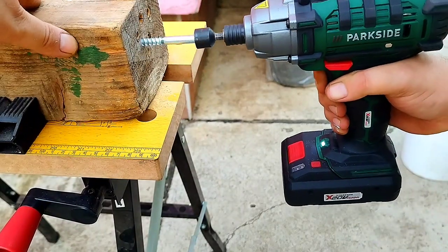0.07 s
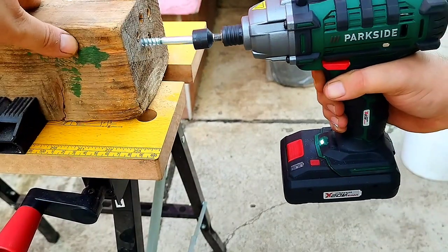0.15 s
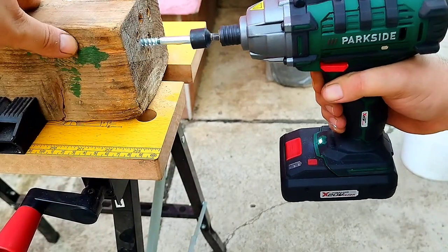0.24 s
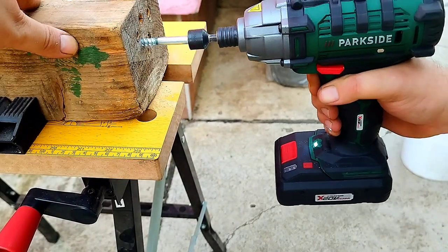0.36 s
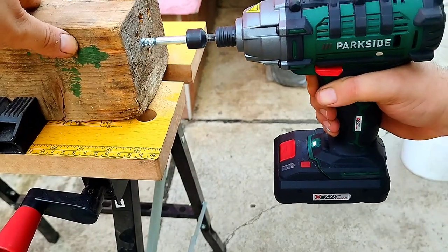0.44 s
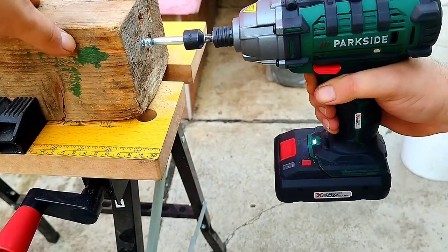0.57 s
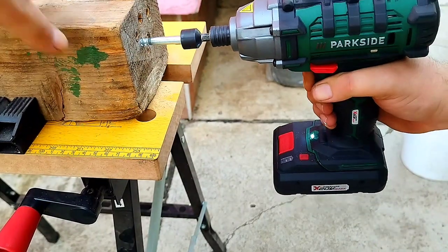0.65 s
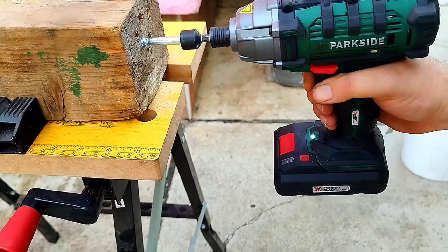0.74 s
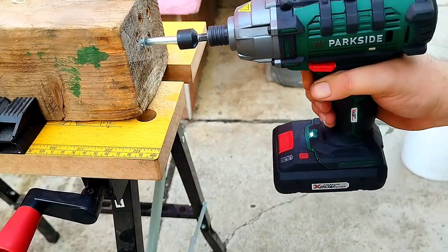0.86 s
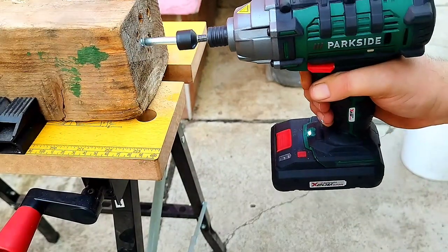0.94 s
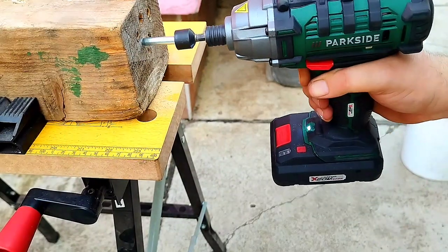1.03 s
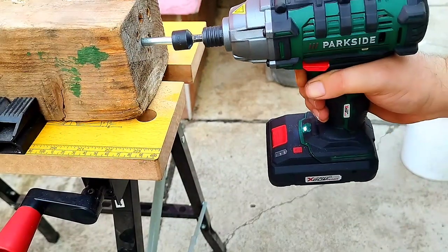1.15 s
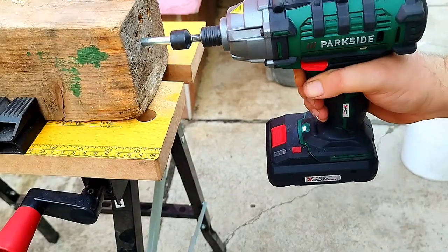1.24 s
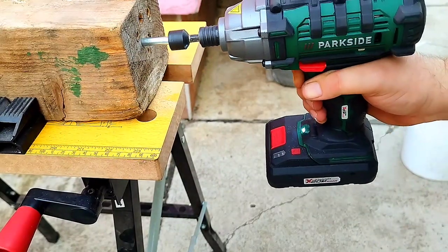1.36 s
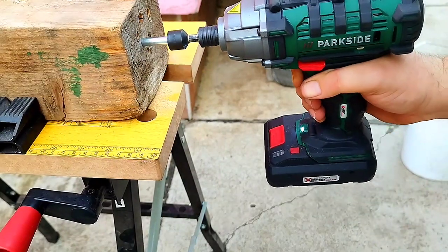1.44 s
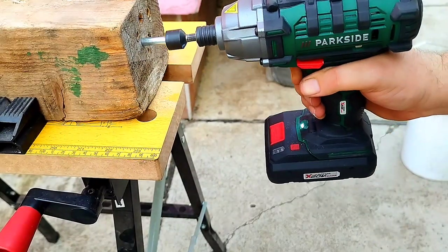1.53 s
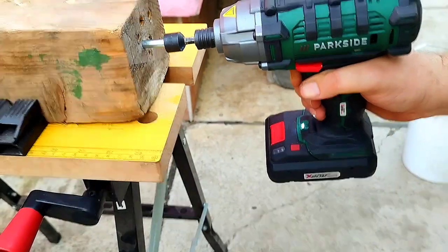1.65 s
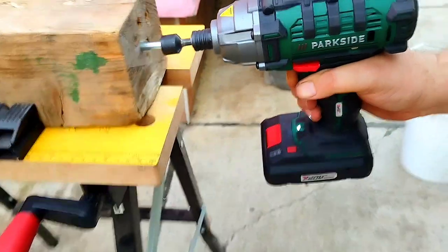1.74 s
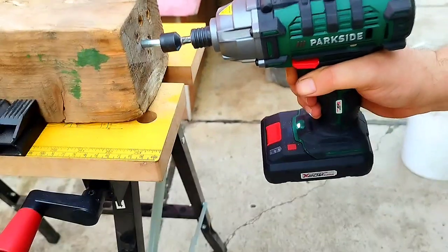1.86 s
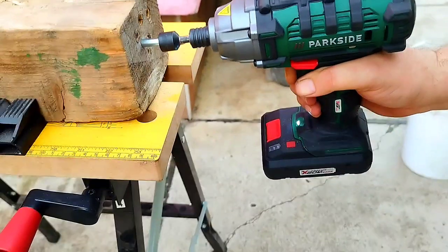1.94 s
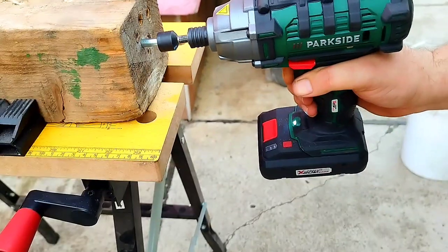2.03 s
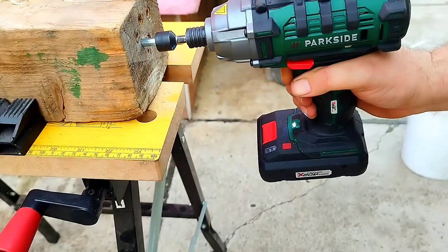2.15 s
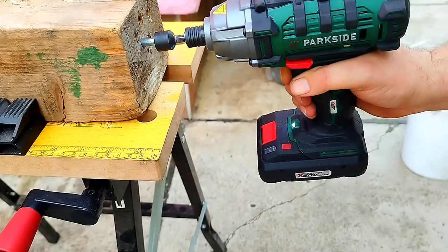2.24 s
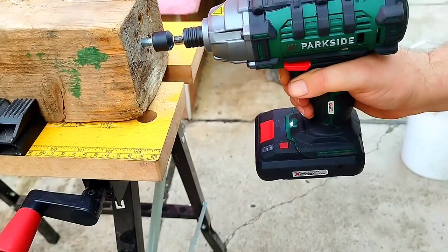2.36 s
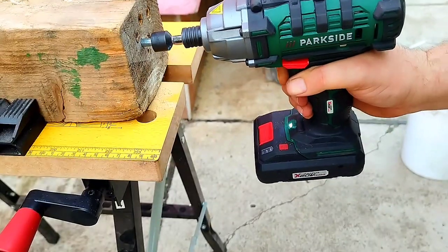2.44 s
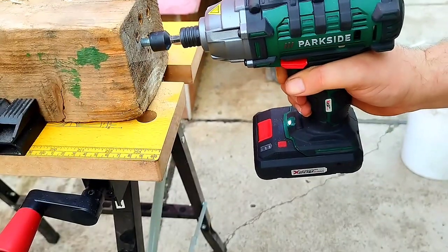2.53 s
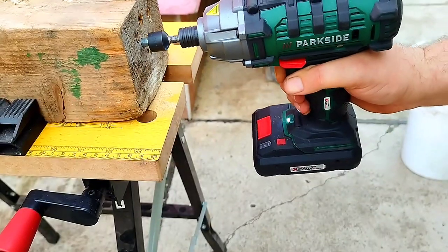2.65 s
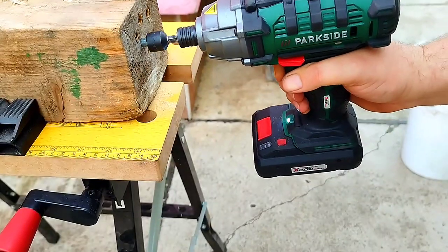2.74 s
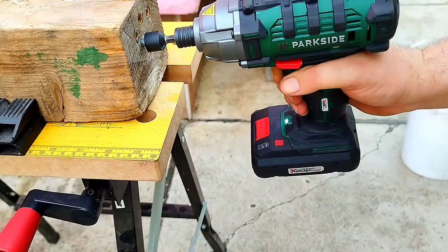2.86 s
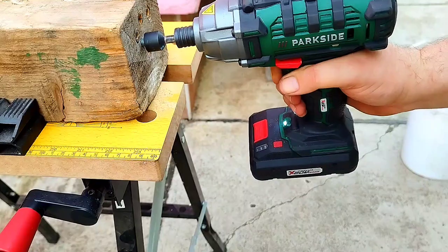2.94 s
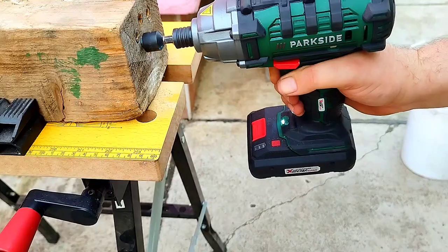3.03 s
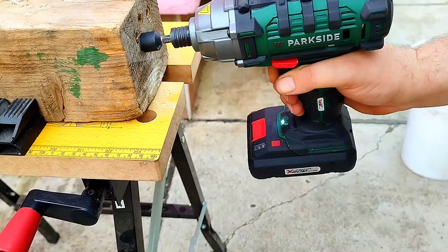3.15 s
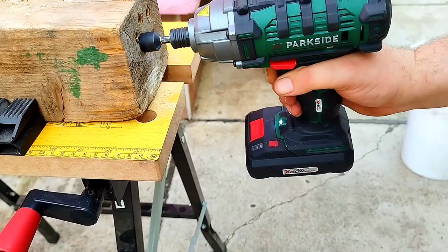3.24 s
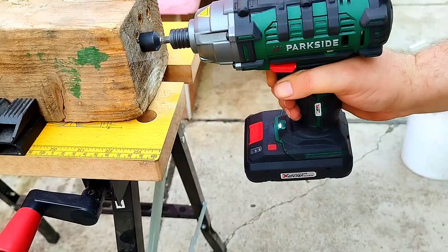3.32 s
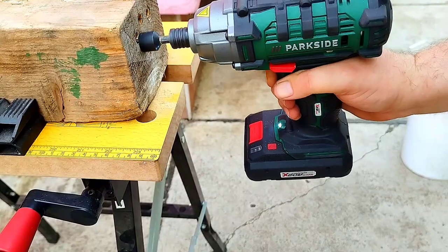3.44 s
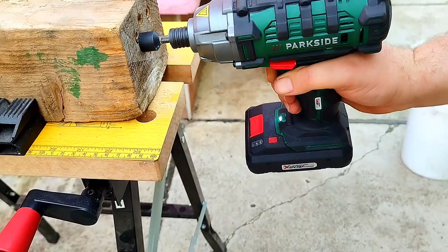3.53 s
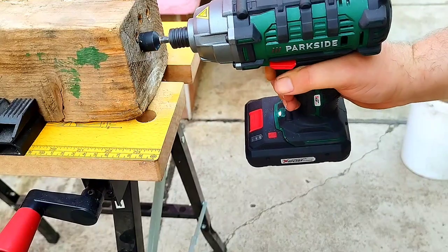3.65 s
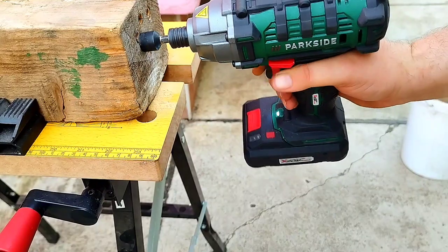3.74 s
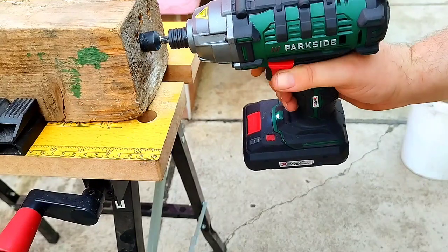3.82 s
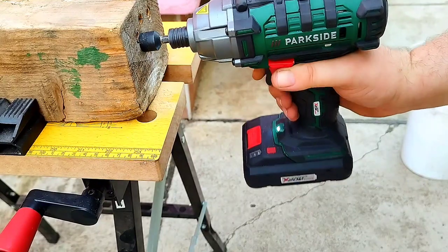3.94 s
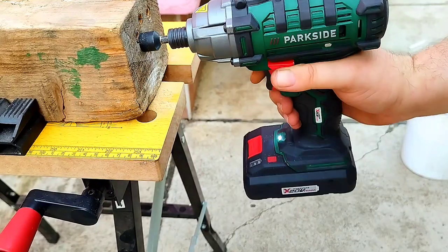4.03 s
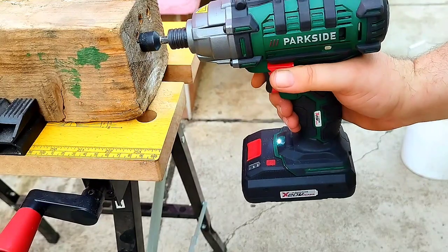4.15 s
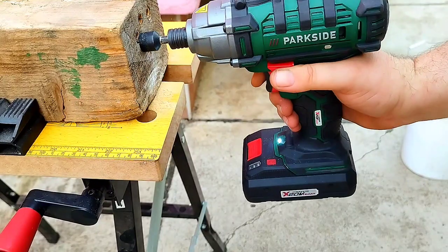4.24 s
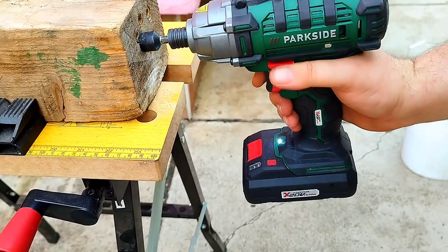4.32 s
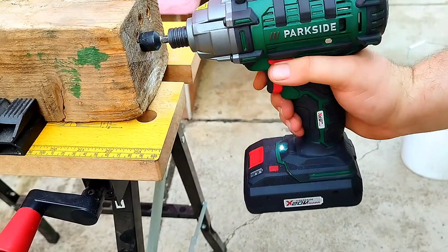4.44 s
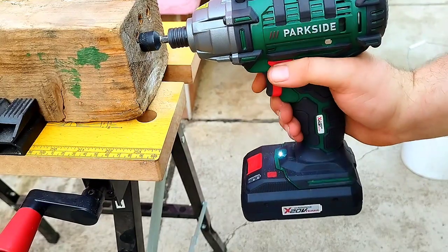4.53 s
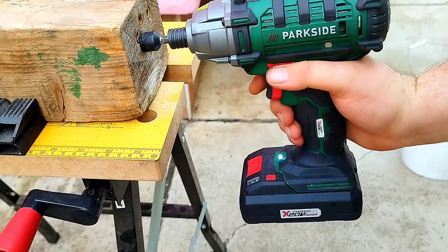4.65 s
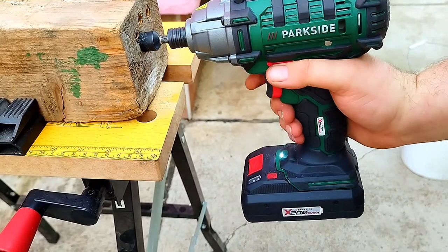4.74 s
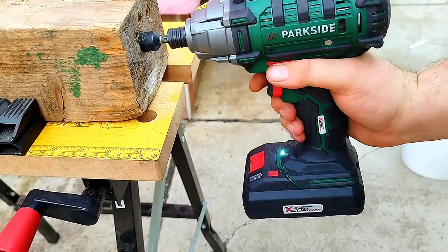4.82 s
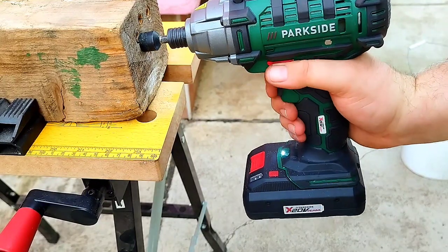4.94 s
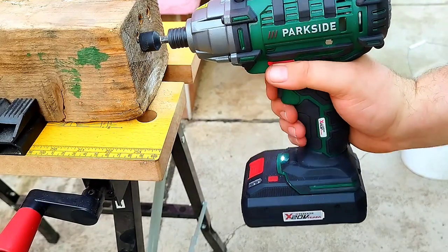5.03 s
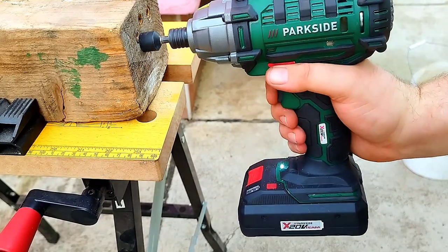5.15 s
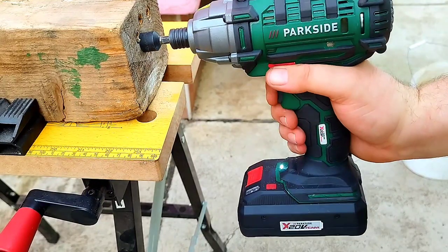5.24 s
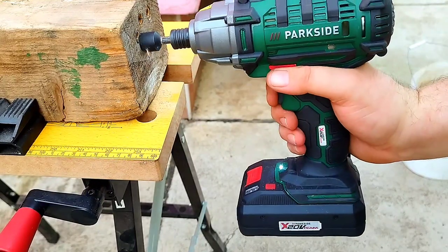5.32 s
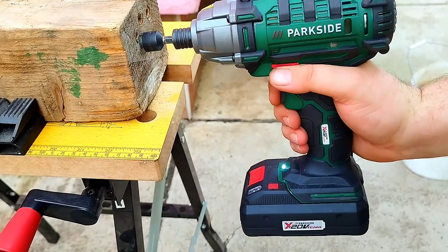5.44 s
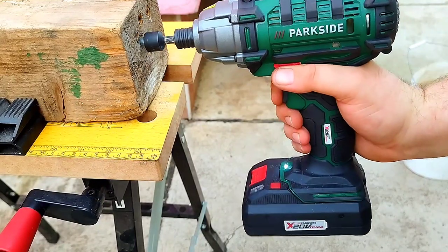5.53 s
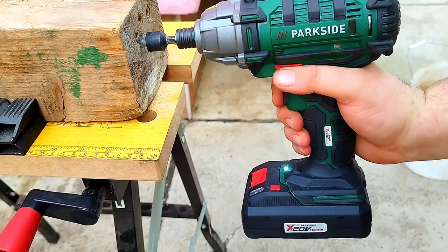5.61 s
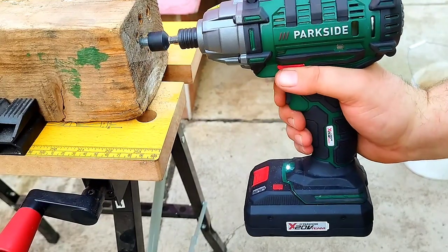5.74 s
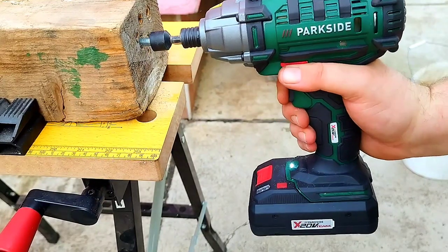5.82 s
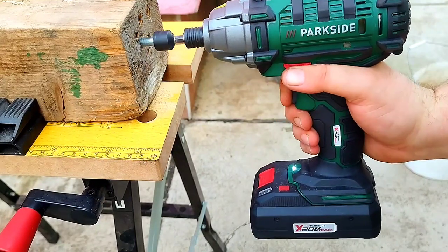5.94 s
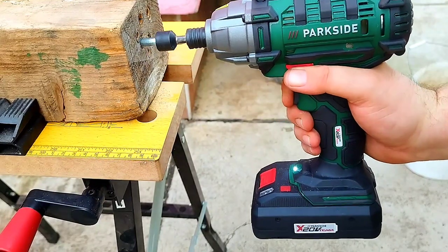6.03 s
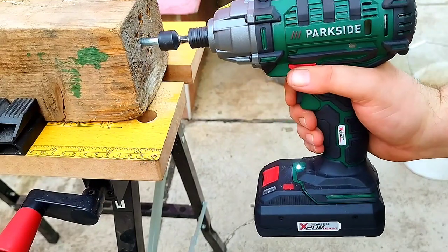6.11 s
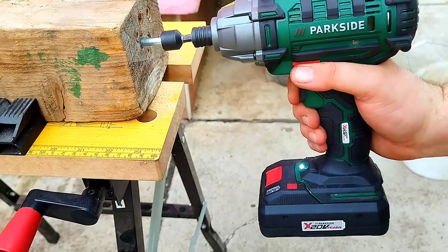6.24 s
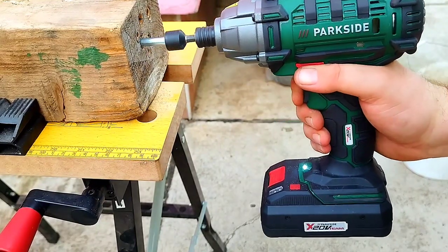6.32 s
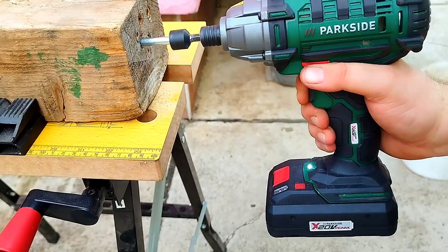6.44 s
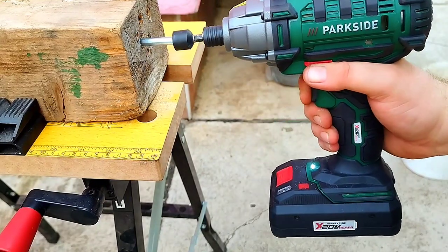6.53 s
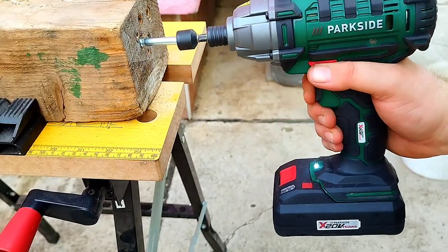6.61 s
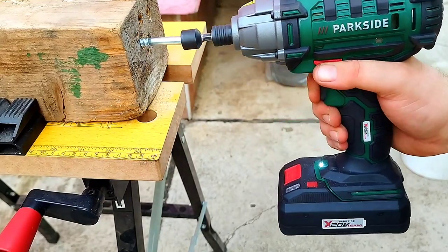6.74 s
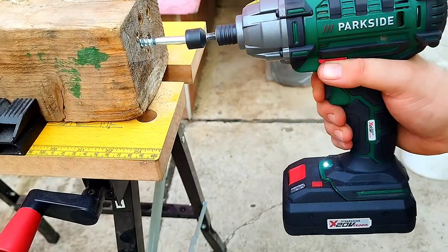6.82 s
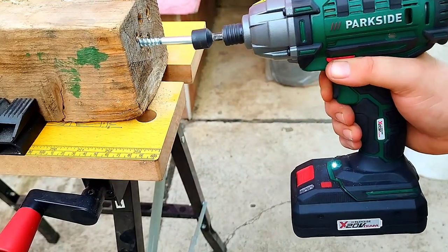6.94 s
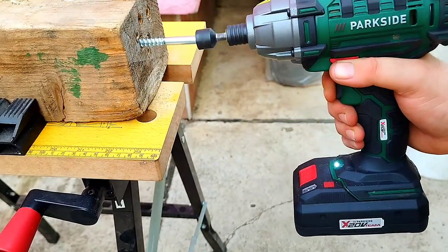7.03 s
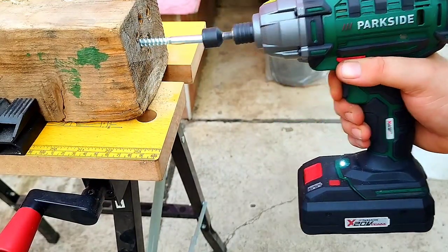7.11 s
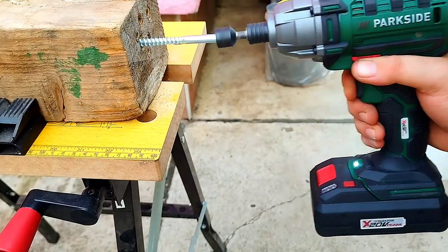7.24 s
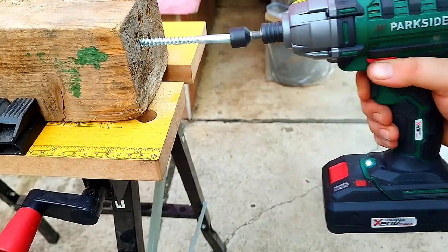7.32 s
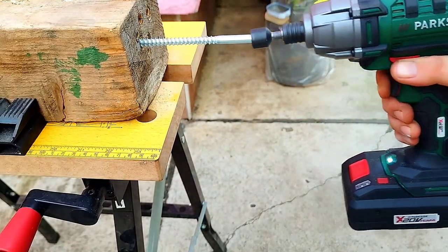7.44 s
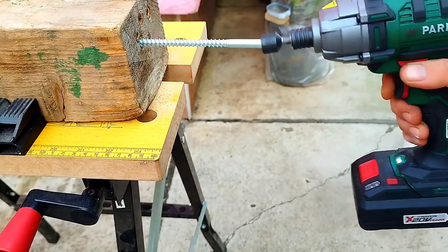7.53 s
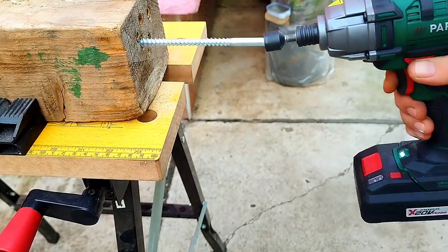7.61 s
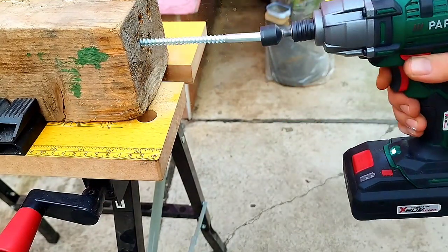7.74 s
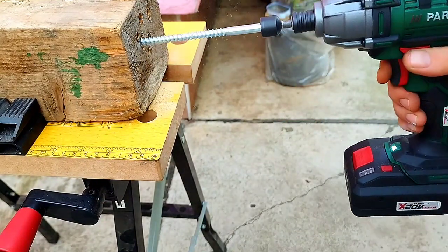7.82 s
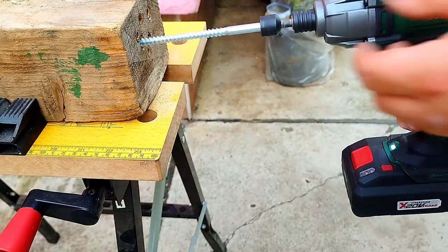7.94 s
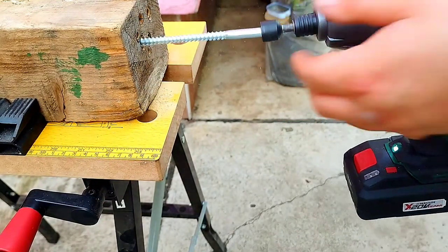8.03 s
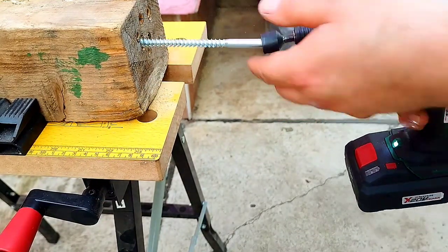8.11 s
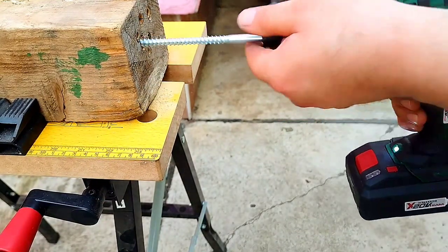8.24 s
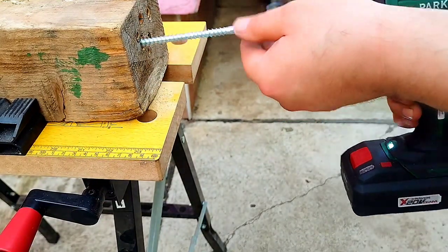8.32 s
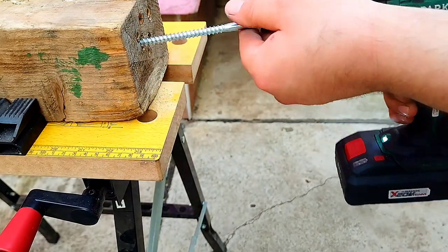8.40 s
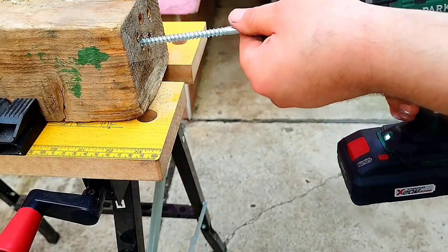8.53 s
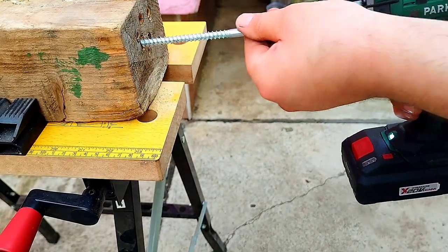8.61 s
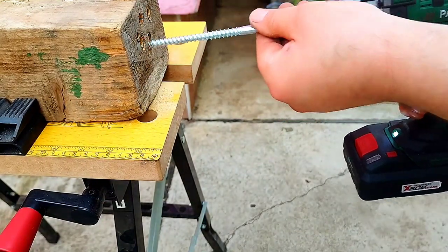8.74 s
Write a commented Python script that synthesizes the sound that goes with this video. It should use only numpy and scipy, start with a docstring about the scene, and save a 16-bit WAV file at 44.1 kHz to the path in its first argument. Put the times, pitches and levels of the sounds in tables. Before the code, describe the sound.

Very close, overloaded stereo pickup of an impact driver outdoors. Dense metallic hammering, about fifty blows a second, over gritty gear whirr drives a screw into a ringing wooden beam. It stops abruptly; switch clicks and faint bird chirps sit over low distant traffic. Hammering resumes in reverse, slows and ends, then the motor spins free in short bursts with a few clicks.

```python
"""First a rapid metal hammering: a cordless impact driver drives a long screw into a beam on a bench outdoors.
It pauses, then backs the screw out and spins free in short bursts. Blows are bursts of noise with a beam ring;
the motor is gear hiss plus a rough tone. In the pause the direction switch clicks, birds whistle far off
and traffic rumbles as low noise. Each blow overloads the near microphone port: its baseline lurches to its rails."""
import sys
import numpy as np
from scipy import signal
from scipy.fft import rfft, irfft, next_fast_len
from scipy.io import wavfile
from scipy.ndimage import uniform_filter1d, minimum_filter1d, map_coordinates

SR = 44100
rng = np.random.default_rng(int(sys.argv[2]) if len(sys.argv) > 2 else 0)


def wav_out(sig):
    """Save sig, one row per channel (or a flat mono array), as 16-bit PCM at SR to the path in sys.argv[1]."""
    wavfile.write(sys.argv[1], SR, np.round(np.clip(np.atleast_2d(sig).T, -1, 1) * 32767).astype(np.int16))


N = 386743  # length in samples

# All levels are relative settings, before the microphone and preamplifier.
# Noise colour of the far traffic: f/Hz, level per Hz/dB
TRAFFIC_COLOUR = [(15, -44.5), (25, -3.5), (64, -16), (80, -20), (157, -14), (195, -10), (242, -6),
                  (293, -23.5), (326, -14.5), (427, -29.5), (16000, -70.5)]
# Far bird whistles: start/s, length/s, top f/Hz, end f/Hz, place of the top (0-1), peak level/dB before panning
BIRD_CHIRPS = [(4.255, .035, 7300, 5900, .05, -71), (4.288, .057, 6250, 5400, .4, -60),
               (4.42, .07, 5800, 5300, .2, -66), (4.605, .07, 5560, 4900, .3, -58),
               (4.635, .032, 4200, 3400, .05, -68)]
# How long the walls' answer takes to fall by 60 dB: f/Hz, t/s
WALL_DECAY = [(300, 0.44), (2000, 0.39), (10000, 0.22)]
# Switch, trigger and bit clicks: t/s, body level/dB, treble level/dB, left-right difference/dB
CLICK_EVENTS = [(4.2558, -49, -70, 2), (4.4043, -27.5, -33.5, -1), (4.4985, -23.5, -25, 1),
                (4.5371, -40.5, -59.5, 7.5), (4.6149, -57, -61.5, -0.5), (4.964, -32, -52.5, 4.5),
                (5.014, -12.5, -29, -0.5), (8.102, -15.5, -34.5, -3), (8.4106, -20, -36.5, -2),
                (8.7123, -37.5, -27.5, -1)]
# Resonances of the plastic housing: f/Hz, width/Hz, level/dB
HOUSING_MODES = [(1200, 700, -4), (2540, 470, 2.5), (4200, 440, -0.5)]
# Resonances of the click spring: f/Hz, width/Hz, level/dB
SPRING_MODES = [(5500, 1000, -5.5), (10180, 1500, -3.5)]
# Noise colour of the gears: f/Hz, level per Hz/dB
GEAR_COLOUR = [(150, -40), (250, -12.5), (800, -5.5), (1200, 0), (1640, -8.5), (2050, -1), (2700, -4),
               (3400, -4.5), (5000, -4), (5900, -4), (6400, -7), (7840, -15), (9400, -10.5), (11100, -12),
               (13000, -19), (16000, -14.5)]
# Parts of the mesh tone under load: multiple of the mesh pitch, level/dB
LOADED_ORDERS = [(1, -5), (2, -7.5), (3, 3)]
# Parts of the mesh tone when spinning free: multiple of the mesh pitch, level/dB
FREE_ORDERS = [(1, -4), (2, -2), (3, 1), (6, -10)]
# Motor speed as the middle pitch of the gear mesh: t/s, f/Hz
MESH_PITCH = [(0, 1495), (.8, 1495), (1.6, 1462), (3.5, 1440), (3.81, 1500), (5.03, 1450), (7.17, 1520),
              (7.3, 1650), (7.45, 1868), (7.61, 2040), (7.65, 1850), (7.95, 1300), (8.03, 1760),
              (8.16, 1600), (8.24, 1300), (8.3, 1700), (8.45, 1600)]
# Stretches of motor running: start/s, stop/s, whirr level/dB at start, at stop,
# mesh tone level/dB at start, at stop, level/dB of the lingering bench and yard ring, relative to the whirr
MOTOR_STRETCHES = [(-.05, 3.8, -15, -16.5, -23, -28.5, -12), (5.017, 7.17, -17, -18, -34, -40, -12),
                   (7.15, 7.28, -21.5, -23, -42, -40, -20), (7.25, 7.64, -23.5, -22, -30.5, -36, -20),
                   (7.61, 7.96, -23.5, -28.5, -42, -47, -20), (7.935, 8.115, -22.5, -26, -42, -43, -17),
                   (8.225, 8.422, -23.5, -26.5, -46, -48, -21)]
# Each hammering run, from first blow to last: t/s, blow rate/(blows per s)
HAMMER_RUNS = [
    [(.0056, 48.42), (.9, 49.98), (3.1, 50.83), (3.5, 52.15), (3.72, 56.3), (3.81, 51.65)],
    [(5.0403, 47.95), (5.8, 47.62), (6.5, 41.6), (7.0, 38.58), (7.12, 35.47), (7.185, 33.95)],
]
# Strength of the blows over time: t/s, blow level/dB, beam ring level/dB
BLOW_STRENGTH = [(0, -14, -30.5), (1, -14, -27), (1.6, -14, -23), (2.5, -14.5, -18), (3.4, -13, -18.5),
                 (3.7, -12.5, -14.5), (3.8, -13, -23), (5.04, -12.5, -18), (5.5, -13.5, -18.5),
                 (6.3, -13, -20), (6.6, -12, -27.5), (7.17, -13, -25)]
# Noise colour of anvil, bit and housing under a blow: f/Hz, level per Hz/dB
STEEL_COLOUR = [(180, -23.5), (300, -6), (550, -9), (800, -4.5), (1300, -10), (1900, -6), (2600, -1),
                (3300, -7), (4200, 0.5), (5200, -10), (6850, -14.5), (10000, -13.5), (15000, -23.5),
                (16000, -23.5)]
# Resonances of the beam: f/Hz, width/Hz, level/dB
BEAM_MODES = [(928, 76, -1.5), (1025, 46, 3.5), (1712, 75, -12), (2080, 70, -1), (2418, 87, -1.5)]
# Different colour of the two microphone ports: f/Hz, left-right difference/dB
PORT_COLOUR = [(300, 2.5), (700, 1), (1300, -1), (2400, -4), (4400, -2), (6000, -5), (9500, 14),
               (13000, 11.5), (15000, 7)]
# How alike the noise is at both ports: f/Hz, likeness (0-1)
PORT_LIKENESS = [(300, 0.4), (1000, 0.65), (2500, .6), (8000, .1)]
# Blows that throw the left baseline farthest: t/s, offset (signal units before limiting)
BASELINE_LURCHES = [(0.15, 0.84), (0.42, 0.53), (0.84, -0.43), (1.46, -0.45), (1.54, -0.5), (1.6, 0.48),
                    (2.02, -0.65), (2.12, 0.48), (3.45, 0.51), (3.59, -0.46), (3.73, 0.46), (5.38, 0.49),
                    (5.46, 0.78), (5.5, 0.5), (5.56, -0.64), (5.67, 0.67), (6.05, 0.73), (6.86, -0.4),
                    (6.91, 0.4)]
# Slow baseline sags after each run: t/s, left size, right size (signal units before limiting)
BASELINE_SAGS = [(3.897, -.4, -0.14), (7.277, -.17, -0.051)]

TRAFFIC_DB = -48.5  # middle level, which then wanders
FREE_S = 7.2  # the tool spins free from here on
SPIN_UP_S, SPIN_UP_DB = .035, 22  # the whirr climbs this far in this time
# a quick brake, then the faint ring of the bench and yard dying away
BRAKE_DB_PER_S, LINGER_DB_PER_S = 450, 88
NUDGE_LEFT, NUDGE_RIGHT = .07, .012  # typical baseline shift from every blow
WANDER = .1  # slow drift of the left baseline
THROW, THROW_SHARE = .27, .2  # a hard left throw, and the share of blows that give one
TOP_HZ = 16000  # nothing is kept from here up


def amp(db):
    """Turn decibels into a plain multiplier."""
    return 10 ** (np.asarray(db) / 20)


def unit(x):
    """Scale a sound to an average strength (rms) of 1."""
    return x / np.sqrt(np.mean(x ** 2) + 1e-20)


def along(points, hz):
    """Read a (f/Hz, value) curve on a log frequency axis."""
    f, values = np.transpose(points)
    return np.interp(np.log(hz + 1), np.log(f + 1), values)


def curves(rows):
    """Give one value per sample for each column after the time."""
    s, *columns = np.transpose(rows)
    return [np.interp(np.arange(N) / SR, s, column) for column in columns]


def wobble(rate):
    """A smooth random curve with this many random points a second."""
    points = rng.standard_normal(int(N * rate / SR) + 4)
    return map_coordinates(points, [np.arange(N) * rate / SR])


def filtered(x, response):
    """Multiply the spectrum of x by a response that depends on frequency."""
    m = next_fast_len(N + SR)
    return irfft(rfft(x, m) * response(np.fft.rfftfreq(m, 1 / SR)), m)[..., :N]


def modes(table):
    """Response of a set of resonances, which ring only after they are struck."""
    def response(f):
        total = 0
        for k, (centre, width, db) in enumerate(table):
            resonance = 1j * f * width / (centre * centre - f * f + 1j * f * width)
            total = total + (-1) ** k * amp(db) * resonance
        return total
    return response


def pair(spectrum, lag_s=-.0006):
    """Partly shared stereo noise of rms 1; a negative lag makes it reach the right port first."""
    def mid_side(hz):
        turn = np.arccos(np.clip(along(PORT_LIKENESS, hz), 0, 1)) / 2
        return amp(along(spectrum, hz)) * [np.cos(turn), np.sin(turn)]
    mid, side = filtered(rng.standard_normal((2, N)), mid_side)
    return unit(np.array([mid + side, np.roll(mid - side, round(lag_s * SR))]))


def patchy(x, depth_db):
    """Random gain patches in time and frequency, so that no two blows have the same colour."""
    z = signal.stft(x, nperseg=256)[2]
    field = uniform_filter1d(rng.standard_normal(z.shape[1:]), size=5, axis=0)
    field = uniform_filter1d(field, size=6, axis=1)
    return signal.istft(z * amp(depth_db * unit(field)), nperseg=256)[1][:, :N]


def decays(times, sizes, rise_s, fall_s):
    """A quick rise and an exponential fall from each time."""
    spikes = np.bincount(np.clip(times * SR, 0, N - 1).astype(int), sizes, N)
    t = np.arange(SR // 8) / SR
    shape = (1 - np.exp(-t / rise_s)) * np.exp(-t / fall_s)
    return signal.fftconvolve(spikes, shape)[:N]


def traffic():
    """Far traffic: low coloured noise whose level wanders slowly."""
    return amp(TRAFFIC_DB + 2.9 * wobble(6)) * pair(TRAFFIC_COLOUR, lag_s=0)


def birds():
    """Thin arched whistles from the right: up to a top, then sliding down."""
    out, t = np.zeros(N), np.arange(N) / SR
    for start, length, top_hz, end_hz, place, db in BIRD_CHIRPS:
        u = np.clip((t - start) / length, 0, 1)  # progress through the whistle
        hz = top_hz - (top_hz - end_hz) * ((u - place) / (1 - place)) ** 2
        out += amp(db) * np.sin(np.pi * u) ** 2 * np.sin(2 * np.pi * np.cumsum(hz) / SR)
    return out * amp([[-6], [3]])  # left, right


def yard(x):
    """The walls answer with decaying noise; each frequency dies at its own speed."""
    hz, t, z = signal.stft(rng.standard_normal((2, SR // 2)), SR, nperseg=256)
    fading = amp(-60 * t / along(WALL_DECAY, hz)[:, None])
    tail = signal.istft(z * fading, SR, nperseg=256)[1]
    tail = tail / np.linalg.norm(tail[0])
    late = np.pad(x, ((0, 0), (300, 0)))  # 300 samples of delay
    return signal.fftconvolve(late, tail, axes=1)[:, :N]


def clicks():
    """Short snaps through the plastic housing and its spring, each with a small rebound."""
    body, treble = np.zeros((2, 2, N + SR))
    t = np.arange(SR // 20) / SR
    strike = (1 - np.exp(-t / 0.00052)) * np.exp(-t / 0.0018)
    rebound = .2 * (t > .004) * np.exp(-(t - .004) / .003)
    for s, body_db, treble_db, pan_db in CLICK_EVENTS:
        snap = (strike + rebound) * rng.standard_normal((2, len(t)))
        snap *= amp([[pan_db / 2], [-pan_db / 2]])
        first = round(s * SR)
        body[:, first:first + len(t)] += snap * amp(body_db)
        treble[:, first:first + len(t)] += snap * amp(treble_db)
    housing = amp(12.5) * filtered(body[:, :N], modes(HOUSING_MODES))
    spring = amp(15.5) * filtered(treble[:, :N], modes(SPRING_MODES))
    return housing + spring


def running():
    """Whirr and mesh tone in dB: spin-up, hold, brake and fading ring of every stretch."""
    t, whirr_db, tone_db = np.arange(N) / SR, np.full(N, -120.), np.full(N, -120.)
    for start, stop, whirr0, whirr1, tone0, tone1, linger_db in MOTOR_STRETCHES:
        after = np.maximum(t - stop, 0)
        up_db = SPIN_UP_DB * np.minimum((t - start) / SPIN_UP_S - 1, 0) - 120 * (t < start)
        brake_db = -BRAKE_DB_PER_S * after
        down_db = np.maximum(brake_db, linger_db - LINGER_DB_PER_S * after)
        whirr_hold = np.interp(t, [start, stop], [whirr0, whirr1])
        tone_hold = np.interp(t, [start, stop], [tone0, tone1])
        whirr_db = np.maximum(whirr_db, whirr_hold + up_db + down_db)
        tone_db = np.maximum(tone_db, tone_hold + up_db + brake_db)
    return whirr_db, tone_db


def mesh_tone(orders, phase):
    """Gear teeth meeting: multiples of one pitch, each fluttering in level on its own."""
    total = 0
    for multiple, db in orders:
        flutter = amp(5 * np.array([wobble(120), wobble(120)]))
        total = total + amp(db) * flutter * np.sin(multiple * phase)
    return total


def motor():
    """Gear hiss with a gritty texture, and the rough mesh tone."""
    whirr_db, tone_db = running()
    grit = amp(1.39 * wobble(300) + 0.8 * wobble(40))
    hiss = unit(grit * patchy(pair(GEAR_COLOUR), depth_db=1.5)) * amp(whirr_db)
    # the screw passes the shaking to the beam (left, right gain/dB)
    hiss = hiss + amp([[5], [-1.5]]) * filtered(hiss, modes(BEAM_MODES))
    hz, = curves(MESH_PITCH)
    phase = 2 * np.pi * np.cumsum(hz * (1 + .012 * wobble(200))) / SR
    loaded, free = mesh_tone(LOADED_ORDERS, phase), mesh_tone(FREE_ORDERS, phase)
    return hiss + amp(tone_db) * np.where(np.arange(N) < FREE_S * SR, loaded, free)


def blow_times():
    """Start of every blow in seconds: where the summed rate passes a whole number."""
    runs = []
    for run in HAMMER_RUNS:
        t = np.arange(run[0][0], run[-1][0], 1 / SR)
        count = np.cumsum(np.interp(t, *np.transpose(run))) / SR
        runs.append(np.interp(np.arange(int(count[-1]) + 1), count, t))
    return np.concatenate(runs)


def hammer():
    """Every blow is a rattling burst of steel and a ring of the beam, each at its own strength."""
    times = blow_times()
    jitter, strike_luck, push_luck, rebound_luck = rng.standard_normal((4, len(times)))
    times = times + .0006 * jitter
    blow_db, ring_db = curves(BLOW_STRENGTH)
    burst = decays(times, amp(0.82 * strike_luck), 0.00053, 0.0069)
    # the hammer rebounds once, more weakly
    burst += .22 * decays(times + .007, amp(2.5 * rebound_luck), .0005, .004)
    rattle = amp(2.03 * np.array([wobble(400), wobble(400)]))  # loose bit and screw chatter after the strike
    steel = unit(burst * rattle * patchy(pair(STEEL_COLOUR), depth_db=1.53)) * amp(blow_db)
    push = decays(times, amp(1.06 * push_luck), 0.000094, 0.00098)
    push = push * pair([(100, 0), (20000, 0)])  # equally strong at all pitches
    ring = unit(filtered(push, modes(BEAM_MODES))) * amp(ring_db)
    return steel + ring


def scene():
    """Add the traffic, the birds, the tool's sounds and the walls' answer."""
    far = traffic()
    struck, snaps, spin = hammer() + birds(), clicks(), motor()
    echo = yard(amp(-11.5) * struck + amp(-17) * snaps + amp(-18.5) * spin)
    return struck + snaps + spin + echo + far


def range_switch(x):
    """Gain control: peaks over a threshold drop the gain one step, held for a moment after the last peak."""
    calm = abs(x).max(axis=0) < .75
    calm[0] = False  # begin with the gain already down
    hold = round(.09 * SR)  # 0.09 s
    low = 1. - minimum_filter1d(calm * 1., hold, origin=(hold - 1) // 2)
    return x * amp(-9 * uniform_filter1d(low, size=40))  # 9 dB down, with softened edges


def baseline():
    """Overload drift: each blow knocks the baseline down and throws it to a new level."""
    times = blow_times() + 0.0014
    left_luck, right_luck, side_luck = rng.standard_normal((3, len(times)))
    thrown = rng.random(len(times)) < THROW_SHARE
    level = np.array([NUDGE_LEFT * left_luck, NUDGE_RIGHT * right_luck])
    level[0] += WANDER * wobble(7)[(times * SR).astype(int)]
    level[0] += THROW * thrown * np.sign(side_luck)
    for s, offset in BASELINE_LURCHES:
        level[0, np.argmin(abs(times - s))] = offset  # the nearest blow
    t = np.arange(N) / SR
    last = np.maximum(np.searchsorted(times, t) - 1, 0)
    # the coupling capacitor lets it sink back
    held = level[:, last] * np.exp(-abs(t - times[last]) / 0.056)
    each = np.ones(len(times))
    left_dip = 0.32 * decays(times, each, 0.0033, 0.011)
    right_dip = 0.057 * decays(times, each, 0.00035, .009)
    dip = np.array([left_dip, right_dip])
    # taking away the running average keeps the dips centred around zero
    drift = uniform_filter1d(held, 60, axis=1) - dip + uniform_filter1d(dip, 5000, axis=1)
    for s, left, right in BASELINE_SAGS:
        u = np.maximum(t - s, 0)
        onset = 1 - np.exp(-u / np.array([[.003], [.04]]))  # rise/s: left, right
        swing = np.exp(-u / 0.2) * np.cos(2 * np.pi * .98 * u)
        drift += [[left], [right]] * onset * swing
    return drift


def record(dry):
    """The two ports colour the sound differently; the preamplifier rounds off at its rails."""
    def ports(hz):
        return amp(np.outer([.5, -.5], along(PORT_COLOUR, hz)))
    x = filtered(range_switch(dry), ports) + baseline()
    rails = np.array([[.7], [.9]])  # left, right, before the final gain
    x = 1.099 * x / (1 + abs(x / rails) ** 4) ** (1 / 4)
    return filtered(x, lambda hz: hz < TOP_HZ)


dry = scene()
out = record(dry)
wav_out(out)
```